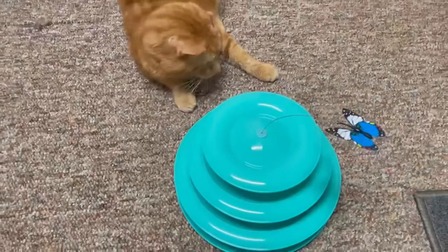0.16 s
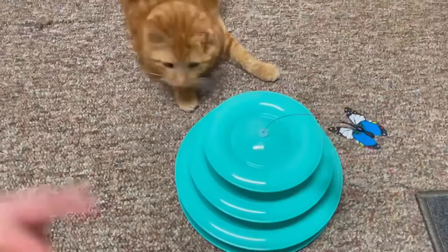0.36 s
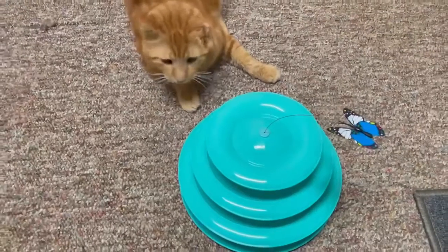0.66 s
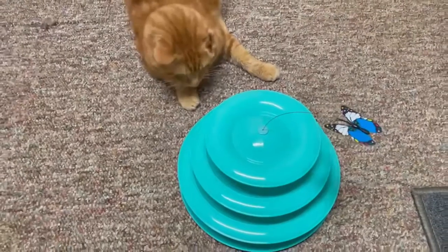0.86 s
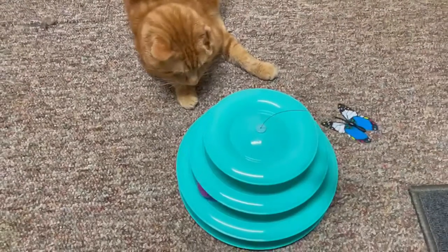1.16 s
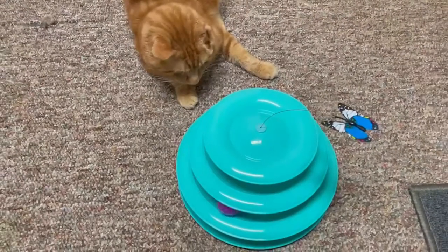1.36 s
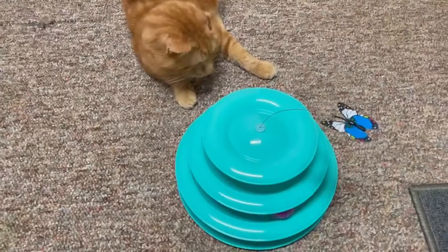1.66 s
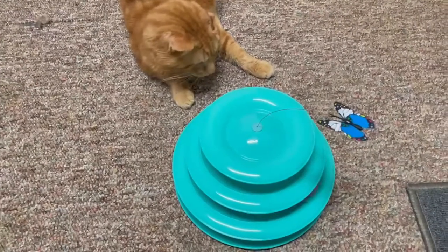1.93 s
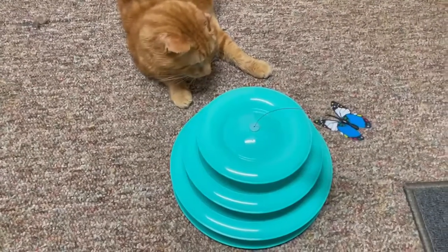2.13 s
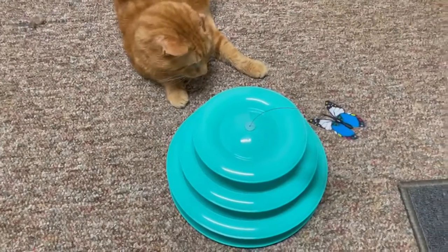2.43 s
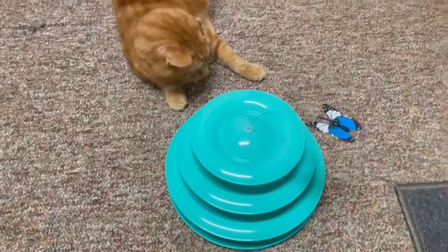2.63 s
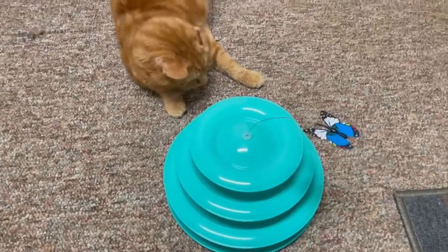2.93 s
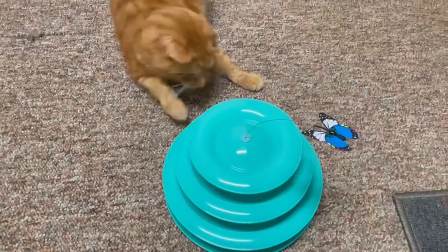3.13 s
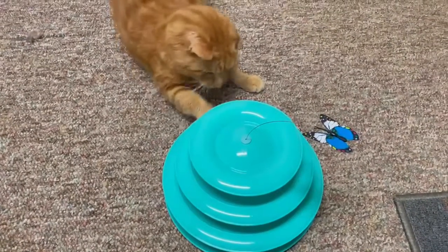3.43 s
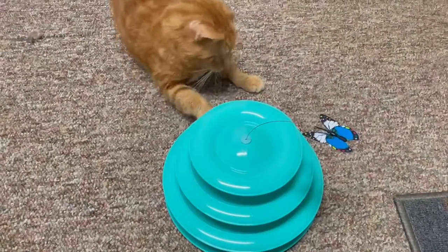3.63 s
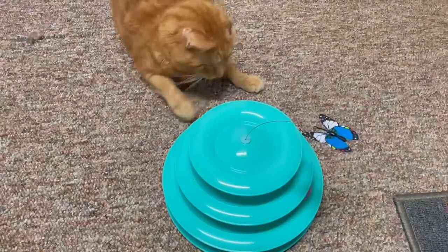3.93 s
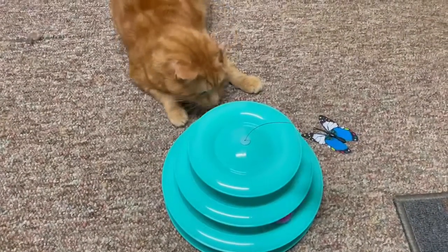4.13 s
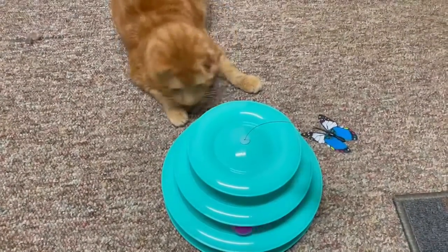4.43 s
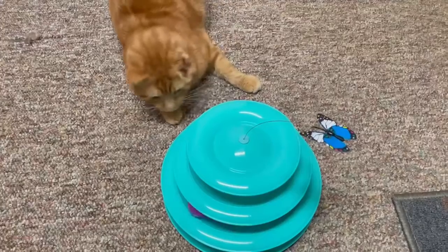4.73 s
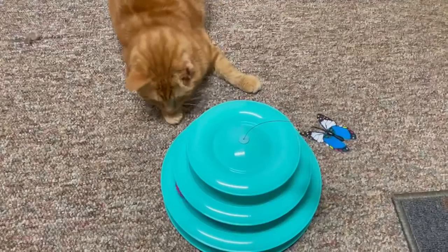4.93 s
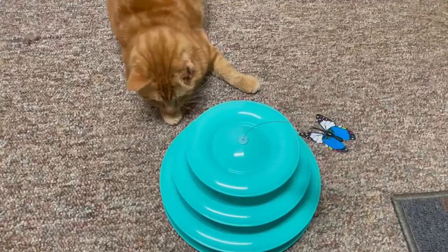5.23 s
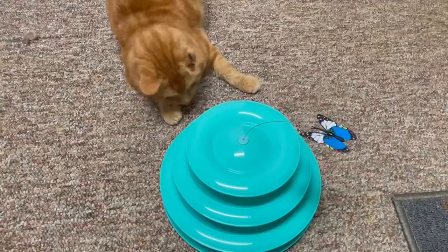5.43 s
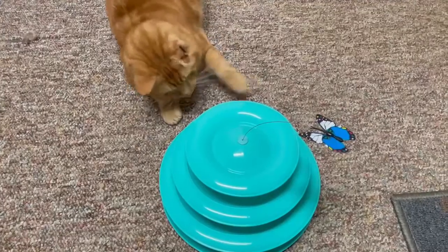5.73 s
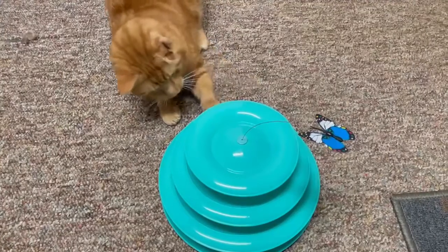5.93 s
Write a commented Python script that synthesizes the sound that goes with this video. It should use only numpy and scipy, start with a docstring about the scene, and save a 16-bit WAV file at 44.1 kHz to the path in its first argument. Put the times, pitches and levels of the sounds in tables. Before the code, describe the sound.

A light ball knocks and chatters along a hollow circular groove, fading over three seconds to a thin roll. A sharp claw tick and paw scuff come with one loud plastic crack, then brisk rumbling and dense knocks that thin out to near quiet. A softer clack with a thin claw squeak ends it. Close microphones, short room echo, very low hush.

```python
"""Hollow ball in a plastic track

A cat swats a hollow plastic ball round a tiered track on carpet in a small room. Random bumps through
track resonances give the rumble, shell taps the rattle; timed knocks, chatters and hums are added.
The roll slows, and two swats crack the ball against the wall with a stiff burst and a hollow ring.
Paws scuff in shaped noise grains; claws tick and squeak; the room adds echoes, a tail and a low rush."""
import sys
import numpy as np
from scipy import signal
from scipy.fft import rfft, irfft
from scipy.io import wavfile
from scipy.ndimage import uniform_filter1d

SR = 44100
rng = np.random.default_rng(int(sys.argv[2]) if len(sys.argv) > 2 else 0)


def unload_audio(sound):
    """Save the sound as a 16-bit wav file, at the path given as the first command line argument."""
    columns = np.transpose(np.atleast_2d(sound))
    # keep every value between -1 and 1, then stretch to whole-number steps
    steps = np.round(np.clip(columns, -1, 1) * 32767)
    wavfile.write(sys.argv[1], SR, steps.astype(np.int16))


N = 268128
TAPS = 8192  # length of every filter response and short sound, samples
HZ = np.fft.rfftfreq(TAPS, 1 / SR)
T = np.arange(N) / SR


def amp(db):
    """Decibels to gain."""
    return 10 ** (np.asarray(db) / 20)


def unit(x):
    """Scales to rms 1."""
    return x / np.sqrt(np.mean(x ** 2) + 1e-20)


def read(points, hz):
    """Interpolates a spectrum table on a log-frequency axis."""
    f, value = np.transpose(points)
    return np.interp(np.log(hz + 1), np.log(f + 1), value)


def add(mix, start_s, sound):
    """Mixes a sound in from start_s."""
    part = mix[max(round(start_s * SR), 0):][:len(sound)]
    part += sound[:len(part)]


def causal(db):
    """Minimum-phase response of this gain: starts at once, rings afterwards."""
    cepstrum = irfft(np.log(amp(db)))
    cepstrum[1:TAPS // 2] *= 2
    cepstrum[TAPS // 2 + 1:] = 0
    return np.exp(rfft(cepstrum))


def mode(hz, width_hz):
    """Frequency response of one resonance."""
    return 1 / (1 + 2j * (HZ - hz) / width_hz)


def impulse(response):
    """Impulse response of a frequency response, faded out at its end."""
    return irfft(response) * np.cos(np.linspace(0, np.pi / 2, TAPS)) ** 2


def peaking(peak_db, response):
    """Impulse response scaled to a peak level."""
    sound = impulse(response)
    return amp(peak_db) * sound / abs(sound).max()


def through(x, response):
    """Filters a long signal and scales it to rms 1."""
    return unit(signal.oaconvolve(x, impulse(response))[:N])


def swell(half_s):
    """Gaussian rise and fall centred in TAPS samples."""
    return np.exp(-((T[:TAPS] - T[TAPS // 2]) / half_s) ** 2)


def grains(per_s, spread_db):
    """Random tiny impacts of uneven strength; power is independent of their rate."""
    size = amp(spread_db * np.minimum(rng.exponential(1, N), 4)) / np.sqrt(per_s)
    present = rng.random(N) < per_s / SR
    return size * rng.choice([-1, 1], N) * present


# room rush spectrum: freq_hz, gain_db
HUSH_COLOUR = [(30, -8), (55, 11.5), (500, -6), (2500, -22.5), (9000, -39.5), (13000, -28.5), (16000, -60)]


def hush(level_db=-70.5):
    """Quiet low rush of the room: shaped noise, independent in each channel."""
    colour = causal(read(HUSH_COLOUR, HZ))
    return amp(level_db) * np.array([through(rng.standard_normal(N), colour) for _ in range(2)])


# reverberation time: freq_hz, t60_s
ROOM_DECAY = [(500, 0.32), (5000, 0.15), (14000, 0.1)]
# first wall and ceiling echoes: delay_s (before jitter), gain (before wet_db)
WALL_ECHOES = [(0.0146, 0.54), (0.019, -0.5), (0.029, 0.16)]


def room(x, wet_db, treble_db, gap_s=0.0002, build_s=0.0013):
    """Direct sound, a few echoes, and a diffuse tail that differs at each microphone."""
    hz, t, z = signal.stft(rng.standard_normal((2, SR // 2)), SR, nperseg=256)
    colour_db = read([(2000, 0), (3500, treble_db)], hz)[:, None] - treble_db
    decay_db = -60 * t / read(ROOM_DECAY, hz)[:, None]
    tail = signal.istft(z * amp(colour_db + decay_db), SR, nperseg=256)[1]
    tail *= np.clip((T[:tail.shape[1]] - gap_s) / build_s, 0, 1)
    tail *= amp(treble_db) / np.linalg.norm(tail, axis=1, keepdims=True)
    for channel in tail:
        for delay_s, gain in WALL_ECHOES:
            jitter_s = rng.uniform(0, 0.0004)  # separate arrival at each microphone
            add(channel, delay_s + jitter_s, np.array([gain]))
    return x + amp(wet_db) * signal.fftconvolve(x[None], tail, axes=1)[:, :N]


# paw strokes: strongest_s, rms_db, rise_s, fall_s
PAW_STROKES = [(.36, -74, 0.46, 0.14), (3.164, -48.5, 0.019, 0.067), (5.826, -51.5, 0.023, 0.044)]
# scuff spectrum: freq_hz, gain_db
SCUFF_COLOUR = [(200, -24), (700, 9.5), (1100, -4.5), (2500, 4.5), (3500, -8.5), (6500, -12), (8500, -32.5),
                (13800, -6.5), (16000, -55.5)]


def scuffs(fibres_per_s=480, spread_db=4):
    """A paw drags over carpet and plastic: a swell of fine catches."""
    stroke = np.zeros(N)
    for s, db, rise_s, fall_s in PAW_STROKES:
        shape = np.where(T < s, ((T - s) / rise_s) ** 2, (T - s) / fall_s)
        stroke += amp(db) * np.exp(-shape)
    return stroke * through(grains(fibres_per_s, spread_db), causal(read(SCUFF_COLOUR, HZ)))


# light sharp claw ticks: start_s, dry_peak_db
CLAW_TICKS = [(0.0974, -58.5), (1.3947, -60), (2.382, -63), (3.1422, -39.5), (3.6902, -59), (4.14, -56),
              (5.1084, -63), (5.7889, -51.5)]
# tick spectrum: freq_hz, gain_db
TICK_COLOUR = [(1000, -30.5), (5000, -3.5), (8500, -24), (13700, 6.5), (16000, -14.5)]


def ticks(crumble=0.11, crumble_s=0.012):
    """Sharp little contacts: an impulse and a brief gritty noise tail."""
    out, t = np.zeros(N), T[:TAPS]
    for start_s, peak_db in CLAW_TICKS:
        touch = (t == 0) + crumble * rng.standard_normal(TAPS) * np.exp(-t / crumble_s)
        add(out, start_s, peaking(peak_db, rfft(touch) * causal(read(TICK_COLOUR, HZ))))
    return out


def squeak(strongest_s=5.846, peak_db=-58.0, half_s=0.017, hz=5930, width_hz=130):
    """A claw slides on plastic: a noise swell through a narrow resonance whistles thinly."""
    out = np.zeros(N)
    slide = rng.standard_normal(TAPS) * swell(half_s)
    add(out, strongest_s - T[TAPS // 2], peaking(peak_db, rfft(slide) * mode(hz, width_hz) ** 2))
    return out


# track resonances: pitch_hz (before detune), width_hz, base_db (before scatter)
TRACK_MODES = [(355.9, 30, 2), (690, 40, 3.5), (781, 13, -1), (930.5, 79, -6), (1397, 17, -10.5),
               (1627, 15, -2)]


def track(colour, scatter_db=3, detune=0.035):
    """One spot of the groove: broad colour times unevenly shifted and excited resonances."""
    weights = amp(scatter_db * (2 * rng.random(len(TRACK_MODES)) + 1.5))
    shifts = 1 + detune * (2 * rng.random(len(TRACK_MODES)) - 1)
    rings = 0
    for weight, shift, (hz, width_hz, db) in zip(weights, shifts, TRACK_MODES):
        rings = rings + weight * amp(db) * mode(hz * shift, width_hz)
    return causal(read(colour, HZ)) * (1 + rings)


# hollow tones of the tiers: strongest_s, dry_peak_db, half_s, pitch_hz
TIER_HUMS = [(1.407, -54, 0.03, 353), (3.298, -41.5, 0.014, 333), (4.231, -45, 0.019, 705),
             (5.806, -43, .009, 708)]


def hums(width_hz=55, skirt_hz=160):
    """A stretch of firm rolling feeds one hollow resonance of the tiers; the last row draws out the ring of the
    second swat."""
    out = np.zeros(N)
    for s, peak_db, half_s, hz in TIER_HUMS:
        bumps = rng.standard_normal(TAPS) * swell(half_s)
        ring = mode(hz, width_hz) * mode(hz, skirt_hz)
        add(out, s - T[TAPS // 2], peaking(peak_db, rfft(bumps) * ring))
    return out


# blow spectrum: freq_hz, gain_db
KNOCK_COLOUR = [(100, -24.5), (650, 0.5), (1080, -2.5), (1350, 9.5), (1800, -4.5), (2250, -2), (2900, -26),
                (6000, -37.5), (8500, -56), (13500, -31), (16000, -64.5)]
# rumble spectrum, shared by thuds and rolling: freq_hz, gain_db
RUMBLE_COLOUR = [(60, -11), (230, -12.5), (320, -4.5), (440, 0), (550, -9.5), (680, -7), (950, -5),
                 (1150, -22), (2500, -73.5)]
SHELL_HZ, SHELL_SPREAD = 1307, 0.057  # pitch at soft_db, random spread as a share
SHELL_WIDTH_HZ, CONTACT_WIDTH_HZ = 200, 680


def shell(db, soft_db=-50, stiffening=0.06, wall_db=-20, body_db=-11):
    """One contact rings the shell a few cycles, higher when harder, and the track a little."""
    hz = SHELL_HZ * amp(stiffening * (db - soft_db)) * (1 + SHELL_SPREAD * (2 * rng.random() - 1))
    ring = mode(hz, SHELL_WIDTH_HZ) * mode(hz, CONTACT_WIDTH_HZ)
    return ring + amp(wall_db) * track(KNOCK_COLOUR) + amp(body_db) * track(RUMBLE_COLOUR)


# single short shell rings (the strong one at 3.187 s answers the big swat like a wall echo): start_s,
# dry_peak_db
BALL_TAPS = [(0.044, -40.5), (0.293, -38), (0.5781, -43), (0.7017, -44.5), (0.896, -50), (0.9423, -48),
             (1.22, -46.5), (1.368, -50), (1.493, -50.5), (1.5804, -47), (1.667, -54.5), (1.982, -50.5),
             (2.6523, -45.5), (3.011, -49.5), (3.1867, -28), (3.452, -40.5), (4.297, -40.5), (4.605, -51),
             (4.859, -52.5), (4.906, -52.5), (4.949, -55), (4.985, -52), (5.031, -53), (5.154, -52.5),
             (5.243, -45), (5.693, -50), (5.8005, -31.5), (5.8443, -44)]


def shell_taps():
    """Short shell rings, mostly the ball dropping back into the groove: one ring per row."""
    out = np.zeros(N)
    for start_s, peak_db in BALL_TAPS:
        add(out, start_s, peaking(peak_db, shell(peak_db)))
    return out


# skips along the wall: strongest_s, dry_peak_db, half_s
SKIP_RUNS = [(0.262, -39.5, 0.018), (0.553, -47.5, 0.013), (1.079, -43, 0.014), (1.305, -43, 0.016),
             (3.389, -37, .016), (3.789, -45, 0.026), (4.22, -44.5, 0.019), (4.293, -39.5, 0.011),
             (4.517, -40, 0.01), (5.56, -51, 0.01)]


def chatters(skips_per_s=260):
    """Quick uneven skips along the wall swell and ebb, each ringing the shell."""
    out = np.zeros(N)
    for s, peak_db, half_s in SKIP_RUNS:
        places = np.arange(0, TAPS, SR / skips_per_s)
        at = (places + rng.random(len(places)) * SR / skips_per_s).astype(int) % TAPS
        skips = np.bincount(at, rng.uniform(0.32, 1, len(at)), TAPS) * swell(half_s)
        add(out, s - T[TAPS // 2], peaking(peak_db, rfft(skips) * shell(peak_db)))
    return out


# biggest jumps in the groove: start_s, blow_db (before level_db), boom_rel_db (before boom_db), rebound_s
JUMPS = [(0.0998, -35, -10, .005), (0.2875, -34.5, -11.5, 0.009), (0.379, -33.5, -12, 0.0078),
         (0.803, -46.5, -5, 0.0074), (1.396, -37.5, -16.5, 0.015), (1.692, -44, -6, 0.0051),
         (1.751, -40.5, -13, 0.013), (2.633, -40.5, -38, 0.0089), (3.0985, -45, -6.5, 0.0084),
         (3.1995, -23.5, -14, 0.0078), (3.2733, -26.5, -22, 0.0096), (3.3662, -33, -8.5, 0.0044),
         (3.534, -31, -13.5, 0.011), (3.563, -33.5, -12, 0.014), (3.635, -35, -9, 0.0089),
         (3.6928, -37, -5.5, 0.0017), (3.7122, -33.5, -5.5, 0.0037), (3.8618, -35, -15, 0.0033),
         (3.8788, -29, -19, 0.011), (3.9375, -32.5, -9, 0.011), (4.088, -36, -15.5, .009),
         (4.1428, -37.5, -4, 0.016), (4.402, -42.5, -7, .007), (4.476, -45, -3, 0.01),
         (4.558, -36, -29, 0.0096), (4.778, -44.5, -15.5, 0.01), (5.188, -41, -24.5, 0.0078),
         (5.266, -42.5, -19, .002), (5.9185, -42, -17, 0.0026), (5.9685, -45, -10.5, .008)]


def knocks(level_db=14.0, boom_db=10, rebound=0.6, rebounds_per_s=600, hardness=0.36, plain_db=-37):
    """Each jump lands with a blow and quick dying rebounds; harder landings are brighter."""
    out = np.zeros(N)
    treble = read([(1600, 0.032), (2300, 0.97)], HZ)
    for start_s, db, boom, length_s in JUMPS:
        places, signs = rng.random((2, 20))
        delays = (np.arange(20) + 0.5 + places) / rebounds_per_s
        decay = np.exp(-(delays / length_s) ** 2 / 2) * (delays < 2 * length_s)
        sizes = rebound * np.sign(signs - 0.5) * decay
        burst = 1 + sizes @ np.exp(-2j * np.pi * np.outer(delays, HZ))
        brightness = causal(hardness * (db - plain_db) * treble)
        crack = impulse(burst * track(KNOCK_COLOUR) * brightness)
        thud = impulse(burst * track(RUMBLE_COLOUR))
        boom_part = amp(boom + boom_db) * thud / np.linalg.norm(thud)
        add(out, start_s, amp(db + level_db) * (crack / np.linalg.norm(crack) + boom_part))
    return out


# hard clacks of ball on track: start_s, dry_peak_db, crack_hz, hollow_hz, hollow_rel_db
SWAT_CLACKS = [(3.1437, -29.5, 2260, 690, -19), (3.157, -8.5, 1560, 378, 6.5),
               (3.245, -34.5, 2310, 365, -8), (5.7897, -43, 1492, 715, 2.5), (5.798, -22.5, 1580, 713, 7),
               (5.827, -38, 2350, 690, 3.5), (5.875, -34.5, 1770, 760, -22.5)]
# clack spectrum: freq_hz, gain_db
CLACK_COLOUR = [(100, -44), (450, 0.5), (850, -28), (1250, 5.5), (1900, 6.5), (2400, 0), (3000, -23),
                (6000, -21), (8500, -40.5), (15000, -27.5)]


def clacks(crack_width_hz=600, crack_db=3, hollow_width_hz=70):
    """A swat slams the ball on the wall: a few cycles of stiff plastic, then a hollow ring."""
    out = np.zeros(N)
    for start_s, peak_db, crack_hz, hollow_hz, hollow_db in SWAT_CLACKS:
        crack = 1 + amp(crack_db) * mode(crack_hz, crack_width_hz)
        wall = causal(read(CLACK_COLOUR, HZ)) * crack
        hollow = mode(hollow_hz, hollow_width_hz) * mode(hollow_hz, crack_width_hz)
        add(out, start_s, peaking(peak_db, wall + amp(hollow_db) * hollow))
    return out


# roll strength over time: time_s, rumble_db (before rolling's level_db)
ROLL_STRENGTH = [(0, -43.5), (0.19, -54.5), (0.3, -52.5), (0.74, -56), (0.9, -58.5), (1, -63), (1.4, -64.5),
                 (1.8, -65.5), (2.27, -67), (2.65, -63), (3.13, -61.5), (3.19, -48), (3.6, -53.5),
                 (4.24, -56.5), (4.65, -64), (5.05, -72.5), (5.42, -78), (5.77, -75)]
BRISK_DB = -60  # rumble_db of a brisk roll


def drive(s):
    """Roll strength at time s, in dB above a brisk roll."""
    return np.interp(s, *np.transpose(ROLL_STRENGTH)) - BRISK_DB


def circling(bumps, colour, laps_per_s=1.0, count=3):
    """The ball passes from spot to spot of the groove, and the ring changes with it."""
    spot = (T * laps_per_s * count).astype(int) % count
    return unit(sum(through(bumps * (spot == k), track(colour)) for k in range(count)))


# rattle spectrum: freq_hz (before each spot's shift), gain_db
RATTLE_COLOUR = [(500, -13.5), (980, -8.5), (1300, 9.5), (1600, 1), (1900, -9.5), (2400, -11.5),
                 (3000, -35.5), (7000, -34), (9000, -72.5), (13500, -22.5), (16000, -53)]


def rattling(pressure, count=10, taps_per_s=380, spread_db=2.8, bright_hz=1900, bright_slope=0.28):
    """Shell taps, sparser as the ball slows, at spots of varied colour; faster rolling is brighter."""
    speed = amp(drive(T))
    per_s = taps_per_s * np.sqrt(speed / speed.mean()) / count
    taps = 0
    for shift in np.linspace(-1, 1, count):
        spot = track(np.array(RATTLE_COLOUR) * [1 + SHELL_SPREAD * shift, 1])
        taps = taps + through(pressure * grains(per_s, spread_db), spot)
    taps = unit(taps)
    dull = signal.sosfiltfilt(signal.butter(4, bright_hz, fs=SR, output="sos"), taps)
    return dull + amp(bright_slope * drive(T)) * (taps - dull)


# passes of the open near side: closest_s
NEAR_SIDE = [1.83, 5.7]


def rolling(level_db=-4.0, bumps_per_s=1000, spread_db=2.0, wobble_db=3.0, wobble_s=0.032,
            flight_s=0.018, flight_db=-5, rattle_slope=1, rattle_lead_db=-6, pass_s=1, pass_db=9):
    """Tiny groove bumps drum the track while the shell rattles, louder on the near side."""
    near = sum(np.exp(-((T - s) / pass_s) ** 2) for s in NEAR_SIDE)
    rumble = amp(drive(T))
    rattle = amp(rattle_lead_db + rattle_slope * drive(T) + pass_db * near)
    noise = rng.standard_normal(N)
    wobble = unit(uniform_filter1d(noise, max(int(wobble_s * SR), 1))).clip(-2, 2)
    # the ball lifts before each knock
    airborne = np.any([(T > landing - flight_s) & (T < landing) for landing, *_ in JUMPS], axis=0)
    pressure = amp(wobble_db * wobble + flight_db * airborne)
    low = rumble * circling(pressure * grains(bumps_per_s, spread_db), RUMBLE_COLOUR)
    return amp(BRISK_DB + level_db) * (low + rattle * rattling(pressure))


def leaned(pair, table):
    """Tilts a pair of channels left or right, band by band."""
    lean = amp(read(table, np.fft.rfftfreq(N, 1 / SR)) / 2)
    return irfft(rfft(pair) * np.array([lean, 1 / lean]), N)


# extra lean of the clacks, from the track's far side: freq_hz, left_minus_right_db
FAR_SIDE_LEAN = [(1350, 2), (1900, -4)]


def scene(bass_hz=70):
    """Each kind of sound passes through the room with its own share of reverberation and treble."""
    paws = room(ticks() + scuffs() + squeak(), wet_db=-3, treble_db=5.0)
    contacts = room(knocks() + chatters() + shell_taps(), wet_db=-9.0, treble_db=10.5)
    swats = leaned(room(clacks(), wet_db=-11.5, treble_db=11.0), FAR_SIDE_LEAN)
    roll = room(rolling() + hums(), wet_db=-8.5, treble_db=7.5)
    small_body = signal.butter(2, bass_hz, "high", fs=SR, output="sos")  # a small toy gives little bass
    return hush() + signal.sosfilt(small_body, paws + contacts + swats + roll)


# stereo width: freq_hz, side_gain_db
STEREO_WIDTH = [(350, -7.5), (700, 0.5), (5000, -2), (8500, 11), (11000, 5.5), (14000, -29)]
# stereo lean: freq_hz, left_minus_right_db
STEREO_LEAN = [(100, 0), (400, 2.5), (1400, 2.5), (2200, -1), (4400, 4), (9000, -0.5)]


def record(dry, low_cut_hz=45, edge_hz=15900):
    """Close microphone pair: bass cut, width and lean per band, then the band limit."""
    hz = np.fft.rfftfreq(N, 1 / SR)
    low_cut = signal.butter(3, low_cut_hz, "high", fs=SR, output="sos")
    left, right = rfft(signal.sosfilt(low_cut, dry))
    mid = (left + right) / 2
    side = (left - right) / 2 * amp(read(STEREO_WIDTH, hz))
    pair = leaned(irfft(np.array([mid + side, mid - side]), N), STEREO_LEAN)
    edge = signal.firwin(511, edge_hz, window=("kaiser", 9), fs=SR)
    return signal.oaconvolve(pair, edge[None], "same")


dry = scene()
out = record(dry)
unload_audio(out)
```